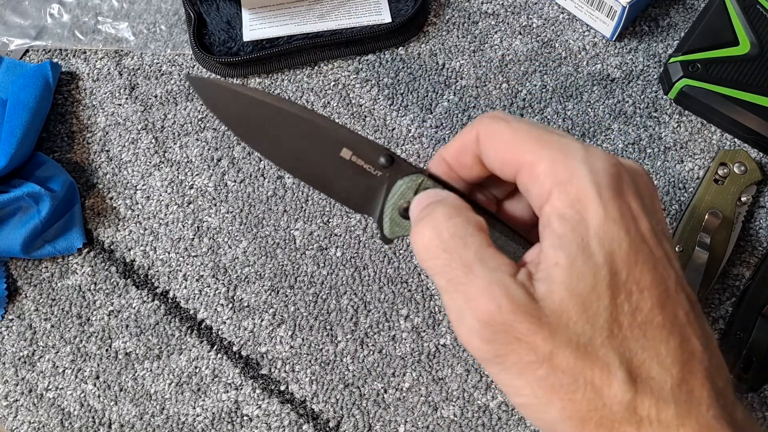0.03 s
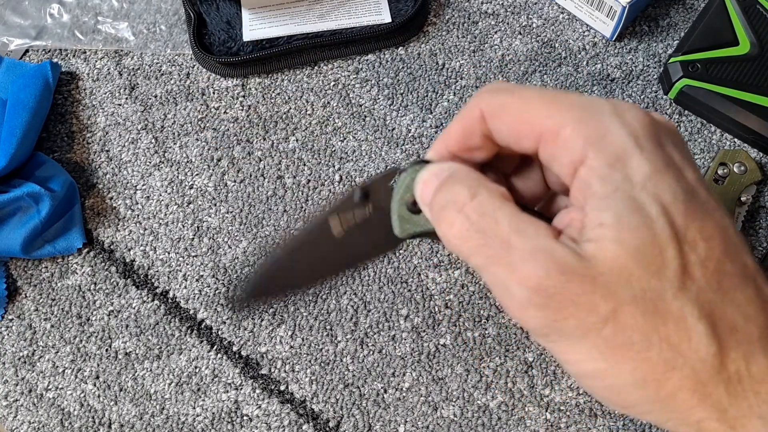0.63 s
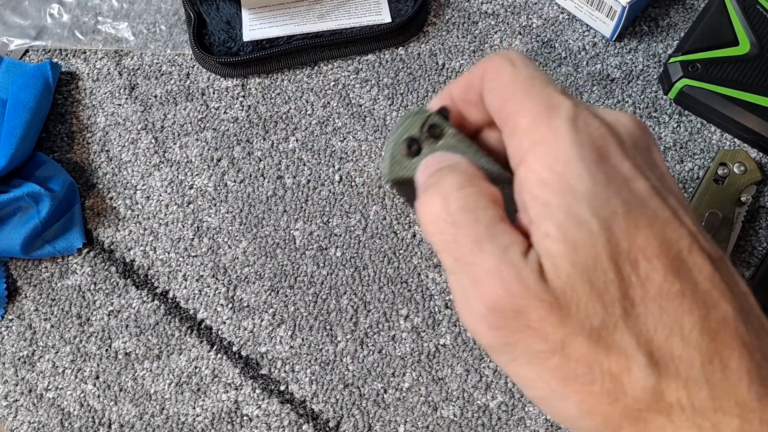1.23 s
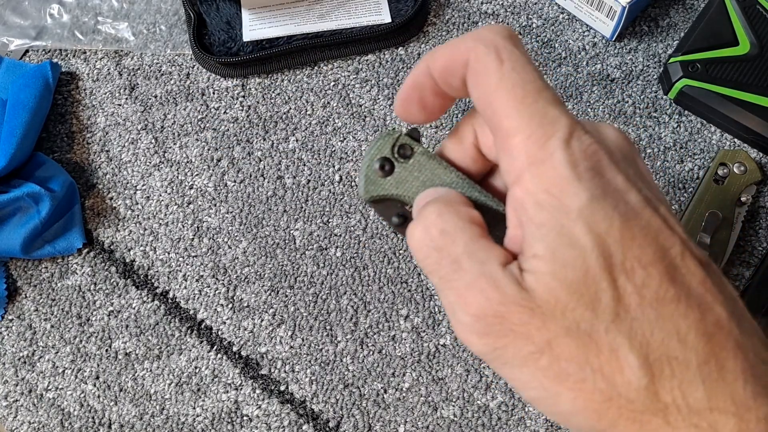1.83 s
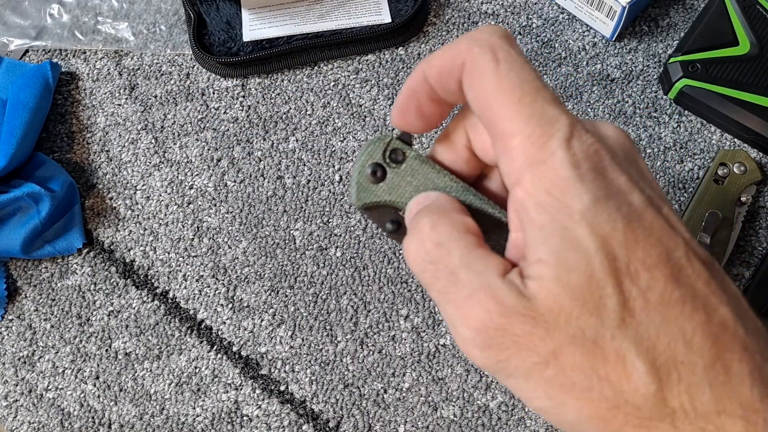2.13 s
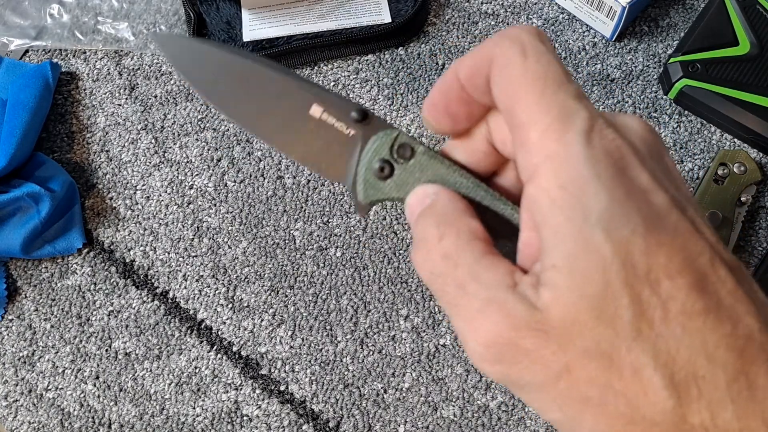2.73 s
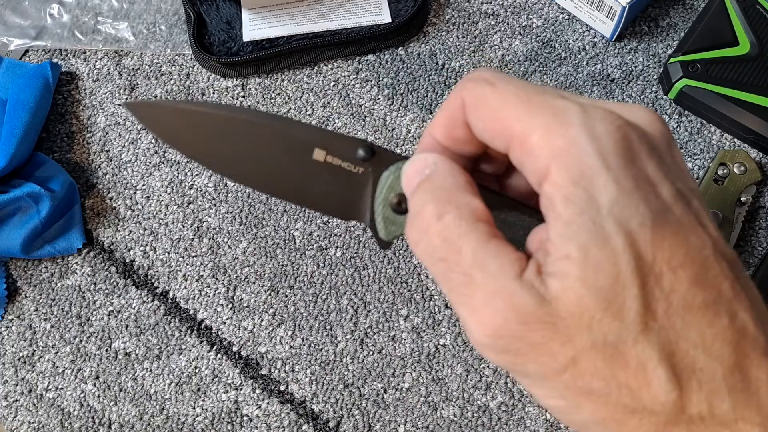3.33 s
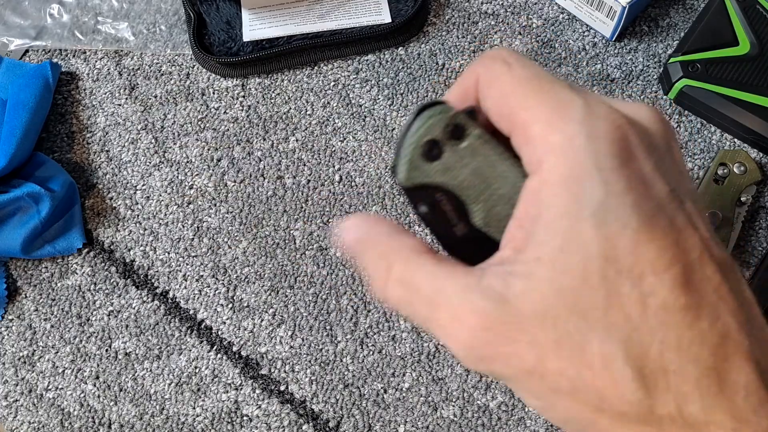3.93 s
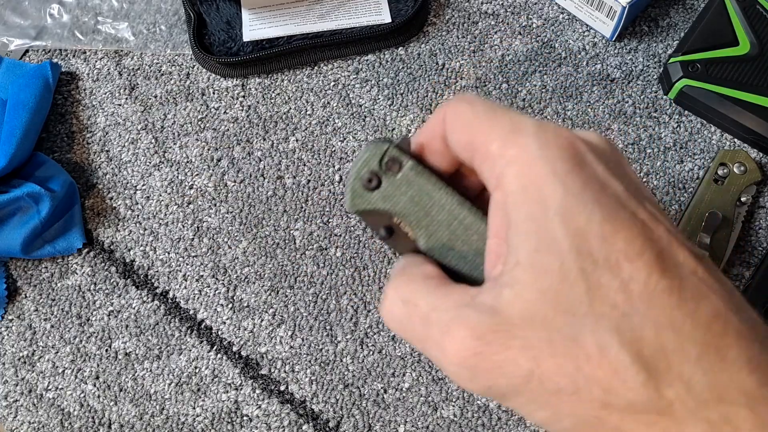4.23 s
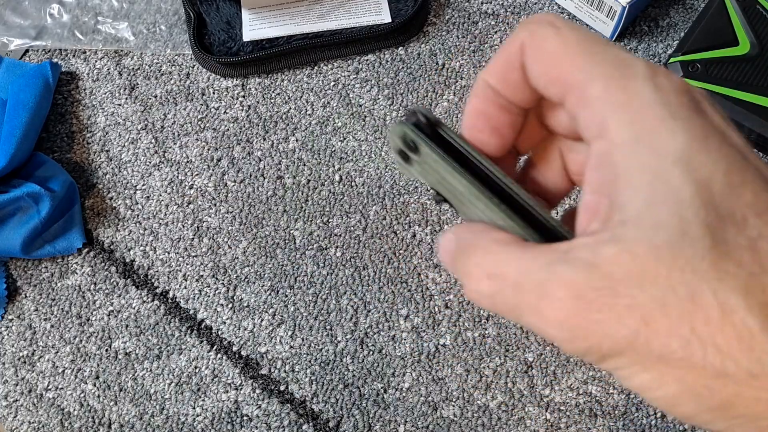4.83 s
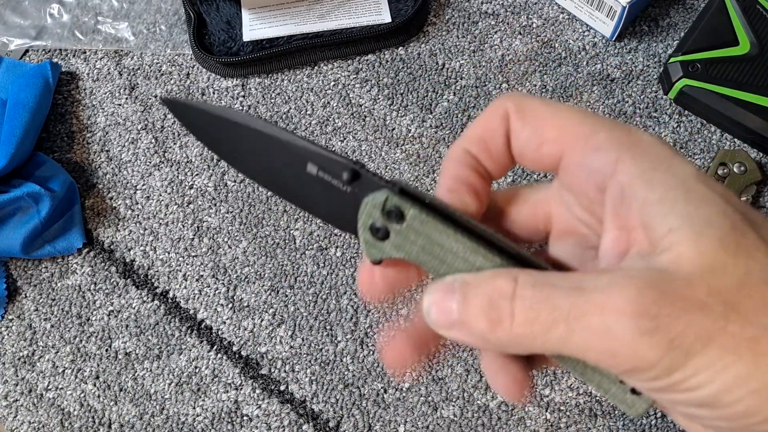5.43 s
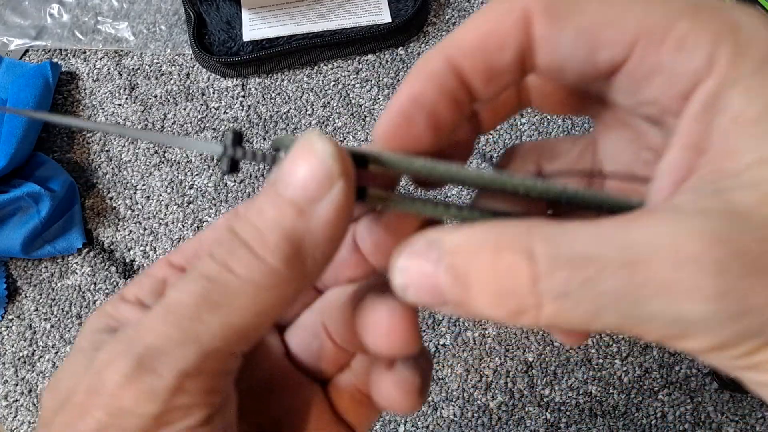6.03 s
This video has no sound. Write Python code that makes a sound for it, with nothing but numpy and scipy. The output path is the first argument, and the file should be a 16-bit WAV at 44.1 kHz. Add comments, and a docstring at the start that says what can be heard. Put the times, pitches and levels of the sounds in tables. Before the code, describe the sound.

In a small, quiet room with a faint low hum, a pocket knife is shut and opened twice, heard from close up. Each closing is a soft lock click followed by a bright steel snap as the blade lands in the handle. Each opening is a tick running straight into a hard clack with a short ring. The second opening rings more, and slight squeaks and faint ticks come from the handling.

```python
"""A pocket knife shut and flicked open twice

Close by, over a carpeted table in a small room, the lock bar is drawn back and the blade snaps into
the handle. On opening, the bar ticks over the tang (the blade's base), then the blade slams on its
stop pin and rings. Each click is a burst of noise plus the fading tones of the struck steel.
The pivot chirps, fingers slide on the grip, and the room hums faintly."""
import sys
import numpy as np
from scipy import signal
from scipy.fft import rfft, irfft
from scipy.io import wavfile
from scipy.ndimage import uniform_filter1d

SR = 44100
rng = np.random.default_rng(int(sys.argv[2]) if len(sys.argv) > 2 else 0)


def store_pcm(level_fs):
    """Save levels as 16-bit WAV."""
    pcm = np.round(np.clip(level_fs, -1, 1) * 32767).astype(np.int16)
    wavfile.write(sys.argv[1], SR, np.atleast_2d(pcm).T)


N = 268436
TIME = np.arange(N) / SR
AGE = TIME[:16384]   # seconds since a short sound began


# The blade hits its stop pin. Each row: start in seconds, relative level in dB, left over right in dB,
# brightness in dB per octave, then the amounts of knock, ring, blade note and jolt in dB.
OPENINGS = [(2.5635, -10, -1, 0.35, 2, -21.5, -23.5, -23.5), (5.2801, -11.5, -3, -0.4, -2, -8.5, -3, -27)]
# The colour of that hit. Each row: frequency in Hz, relative level in dB.
OPENING_COLOUR = [(40, -23), (150, -12), (280, -24.5), (560, -27.5), (800, -21.5), (980, -10.5),
                  (1350, -17.5), (2030, -5.5), (2500, -15.5), (3500, -6), (5200, -5.5), (7000, 2),
                  (8600, -2.5), (9350, 3.5), (10600, -7.5), (12400, -3.5), (13700, -4), (15300, 0.5),
                  (17000, -22.5)]
# The open blade's tones. Each row: pitch in Hz, relative level in dB, seconds to fade by 60 dB.
BLADE_TONES = [(927, -24.5, 0.1), (1008, -17, 0.07), (2029, -16.5, .14), (2080, -20.5, 0.12),
               (3260, -19.5, 0.12), (3610, -17, 0.11), (3993, -13.5, 0.069), (7550, -13.5, .06),
               (9200, -13, 0.064), (9450, -13, .07), (11800, -18.5, 0.1), (12400, -9.5, 0.1),
               (14800, -11, .11), (15100, -13.5, .06)]

def blade_opens():
    """The blade slams on its stop pin and rings."""
    return blows(OPENINGS, OPENING_COLOUR, BLADE_TONES,
                 gain_db=-3, rise=0.00022, t60=0.017, apart=0.6, knock_hz=1610)


def blade_note(hz, t60, rise, gain_db):
    """The open blade bends and sings one note when the grip leaves it free."""
    out = np.zeros((2, N))
    for start, db, pan_db, *_, note_db, _ in OPENINGS:
        add(out, start, tone(hz, t60, rise), db + note_db + gain_db, pan_db)
    return out


def hand_jolts(hz, t60, gain_db):
    """The stopped blade jerks knife and hand, making a soft, low thump."""
    out = np.zeros((2, N))
    thump = np.sin(2 * np.pi * hz * AGE) * dying(t60)
    for start, db, pan_db, *_, jolt_db in OPENINGS:
        add(out, start, thump, db + jolt_db + gain_db, pan_db)
    return out


# The blade lands in the handle. Each row: start in seconds, relative level in dB,
# left over right in dB, brightness in dB per octave, knock in dB, ring in dB.
CLOSINGS = [(0.8705, -13.5, -2.5, 3, -2, -20.5), (0.8792, -29, 6, -3.5, 1.5, -13),
            (4.0596, -13, 0.5, -0.8, 0.5, -36.5), (4.0681, -19.5, -0.5, 0, 6.5, -21.5)]
# The colour of that hit. Each row: frequency in Hz, relative level in dB.
CLOSING_COLOUR = [(60, -32.5), (200, -33.5), (500, -33), (1100, -29), (1650, -23.5), (2600, -22.5),
                  (3500, -12.5), (4500, -5.5), (5700, -5.5), (6700, 6), (8000, -3), (9500, -1),
                  (10700, -11.5), (12400, -5), (15500, -9.5), (17000, -29.5)]
# The shut knife's tones. Each row: pitch in Hz, relative level in dB, seconds to fade by 60 dB.
HANDLE_TONES = [(1568.6, -29, 0.046), (3514, -11, 0.058), (4700, -11.5, 0.071), (6616, -11, .05),
                (6900, -1, 0.052), (7900, -5.5, .06), (8770, -7.5, 0.069), (9120, 1, 0.054),
                (9550, -1.5, 0.22), (13200, -6.5, 0.13), (15000, -6.5, 0.065)]

def blade_shuts():
    """The blade falls into the handle and bounces once, and the handle rings."""
    return blows(CLOSINGS, CLOSING_COLOUR, HANDLE_TONES,
                 gain_db=-3, rise=0.0019, t60=0.019, apart=0.8, knock_hz=2510)


# The lock lets go. Each row: start in seconds, relative level in dB, left over right in dB,
# brightness in dB per octave, knock in dB, ring in dB.
RELEASES = [(0.5755, -31, -1.5, 0.57, 1.5, -12), (3.4068, -31.5, -0.5, -1.5, -4, -5)]
# The colour of that click. Each row: frequency in Hz, relative level in dB.
RELEASE_COLOUR = [(120, -20.5), (330, -0.5), (520, 1.5), (900, -10), (1800, -6.5), (2700, -20), (3400, -10),
                  (4400, -6.5), (6400, -4), (9400, -3), (10400, -10), (13000, -2.5), (15600, -3),
                  (17000, -20.5)]
# Lock bar and spring tones. Each row: pitch in Hz, relative level in dB, seconds to fade by 60 dB.
BAR_TONES = [(1570, -24, .06), (3340, -18.5, .04), (6600, -9.5, 0.044), (9360, 1.5, 0.069),
             (13400, -12, .04), (15600, -11.5, 0.037)]

def lock_releases():
    """The lock bar breaks free of the tang with a click."""
    return blows(RELEASES, RELEASE_COLOUR, BAR_TONES,
                 gain_db=-2, rise=0.00089, t60=0.0088, apart=0.44, knock_hz=1211)


# The bar's ticks. Each row: start in seconds, relative level in dB, brightness in dB per octave,
# ring in dB.
BAR_TICKS = [(0.784, -55.5, 0.5, -9.5), (0.8184, -41, 4.5, -17), (2.2530, -57, 2.5, -15),
             (2.4887, -34.5, -0.5, -20), (2.5031, -23, -1, -18.5), (3.626, -45, 4.5, -1),
             (5.2275, -38, -1.5, -23.5), (5.24, -20, 0, -22), (5.893, -50, 7.5, -13.5),
             (6.0502, -58, -5, -27.5)]
# The colour of a tick. Each row: frequency in Hz, relative level in dB.
BAR_TICK_COLOUR = [(100, -43.5), (300, -35.5), (1000, -32.5), (1520, -22.5), (2200, -28.5), (3800, -11.5),
                   (4800, -6.5), (6500, -0.5), (9500, 1), (11300, -7.5), (13500, -5), (15600, -0.5),
                   (17000, -19)]

def lock_ticks(pan_db, knock_db):
    """The lock bar ticks over the tang, always from one place and equally squarely."""
    rows = [(start, db, pan_db, tilt, knock_db, ring_db) for start, db, tilt, ring_db in BAR_TICKS]
    return blows(rows, BAR_TICK_COLOUR, BAR_TONES,
                 gain_db=-5.5, rise=0.0007, t60=0.015, apart=1.0, knock_hz=2500)


def blows(rows, colour, ring_tones, gain_db, rise, t60, apart, knock_hz):
    """Each blow is a clack plus the struck part's ring; a squarer blow has more low knock."""
    out = np.zeros((2, N))
    for start, db, pan_db, tilt, knock_db, ring_db, *_ in rows:
        shaded = [(hz, level + tilt * np.log2(hz) + knock_db / (1 + (hz / knock_hz) ** 4))
                  for hz, level in colour]
        sound = clack(shaded, rise, t60, apart) + from_db(ring_db) * ringing(ring_tones, rise)
        add(out, start, sound, db + gain_db, pan_db)
    return out


def clack(colour, rise, t60, apart):
    """Steel chatters briefly on steel; `apart` sets how much left and right differ."""
    white = rng.standard_normal(len(AGE)) + apart * rng.standard_normal((2, len(AGE)))
    force = rfft(white * struck(rise, t60))
    # Even out the burst, so its broad colour comes from the struck part alone.
    spread = np.sqrt(uniform_filter1d(np.abs(force) ** 2, size=601, axis=1))
    gain = from_db(at_hz(colour, np.fft.rfftfreq(len(AGE), 1 / SR)))
    sound = irfft(force * minimum_phase(gain / spread))
    energy = np.sum(sound ** 2, axis=1, keepdims=True)
    return sound * np.sqrt(0.003 * SR / energy)   # as much energy as 3 ms at level 1


def ringing(tones, rise):
    """Every blow shares itself out a little differently among the steel's tones."""
    shares_db = rng.normal(0, 2, len(tones))
    return sum(from_db(db + share) * tone(hz, t60, rise)
               for (hz, db, t60), share in zip(tones, shares_db))


def tone(hz, t60, rise):
    """One pure tone that builds up during the blow and dies away."""
    return np.sin(2 * np.pi * (hz * AGE + rng.random())) * struck(rise, t60)


# Tiny squeaks. Each row: start in seconds, relative level in dB, pitch in Hz, unsteadiness in Hz.
SLIPS = [(3.502, -76.5, 3130, 80), (3.510, -47.5, 3080, 76), (3.564, -55, 3390, 90), (3.663, -52, 3466, 89),
         (4.901, -60, 2550, 260), (4.925, -57.5, 2666, 260)]

def pivot_chirps(slip_s, gain_db, third_db):
    """Pivot and grip stick and slip, making a brief, unsteady tone with two overtones."""
    out = np.zeros((2, N))
    average_db = np.mean([db for _, db, *_ in SLIPS])
    swell = np.sin(np.pi * np.minimum(AGE / slip_s, 1)) ** 2
    for start, db, hz, width_hz in SLIPS:
        wander = np.cumsum(rng.standard_normal(len(AGE))) * np.sqrt(2 * np.pi * width_hz / SR)
        phase = 2 * np.pi * hz * AGE + wander
        overtones = np.sin(2 * phase) + from_db(third_db) * np.sin(3 * phase)
        overtone_db = -0.5 - 0.03 * (db - average_db)   # louder slips are slightly purer
        chirp = swell * (np.sin(phase) + from_db(overtone_db) * overtones)
        add(out, start, chirp, db + gain_db, pan_db=0)
    return out


# Fingers move on the grip. Each row: fastest moment in seconds, level then in dB.
FINGER_SLIDES = [(4.85, -76), (5.88, -79.5)]

def finger_slides(band_hz, grain_db, rise_db_per_s, fall_db_per_s):
    """Skin rubs the textured grip: a grainy whisper that swells slowly and fades sooner."""
    level = sum(from_db(db - np.maximum(rise_db_per_s * (peak - TIME), fall_db_per_s * (TIME - peak)))
                for peak, db in FINGER_SLIDES)
    grains = rng.standard_normal((2, N)) * from_db(grain_db * rng.standard_normal(N))
    return level * rms_one(band_pass(grains, band_hz))


# How long echoes last. Each row: frequency in Hz, seconds to fade by 60 dB.
ECHO_TIMES = [(200, 0.5), (800, 0.2), (2000, 0.2233), (5500, 0.28), (9000, 0.2623), (15000, 0.25)]
# How strong echoes are. Each row: frequency in Hz, level in dB relative to the knife.
ECHO_LEVELS = [(200, -5), (500, -12.5), (1000, -4), (3000, -9), (7000, -12.5), (15000, -13.5)]

def room_echoes(knife, first_s, early_db, early_t60):
    """Sound scatters off hand and table, then the room echoes, longest in the bass."""
    edges_hz = np.geomspace(120, 18000, 11)
    white = rng.standard_normal((2, 2, len(AGE)))
    scatter = rng.standard_normal((2, len(AGE))) * dying(early_t60) * (AGE > first_s / 2)
    response = from_db(early_db) * rms_one(scatter) / np.sqrt(len(AGE))
    for k, (low, high) in enumerate(zip(edges_hz, edges_hz[1:])):
        hz = np.sqrt(low * high)
        fade = dying(at_hz(ECHO_TIMES, hz)) * np.clip(AGE / first_s - 1, 0, 1)
        band = band_pass(white[k % 2], [low, high])
        response += from_db(at_hz(ECHO_LEVELS, hz)) * band * fade / np.sqrt(np.sum(fade ** 2))
    return signal.fftconvolve(knife, response, axes=1)[:, :N]


# An appliance's tones. Each row: pitch in Hz, level in dB before the left-right split.
HUM_TONES = [(57, -72.5), (150.5, -81.5)]

def appliance_hum(pan_db):
    """An appliance hums on steady, low tones."""
    hum = sum(from_db(db) * np.sqrt(2) * np.sin(2 * np.pi * (hz * TIME + rng.random()))
              for hz, db in HUM_TONES)
    return hum * pan(pan_db)


# The colours of the rumble and the hiss. Each row: frequency in Hz, relative level in dB.
RUMBLE_COLOUR = [(13, -49), (22, -24), (37, -8), (59, 2), (81, -8), (109, -4), (129, -20.5), (157, -14),
                 (178, -26.5), (238, -22.5), (322, -30.5), (354, -29), (495, -35.5), (1000, -51),
                 (1300, -74), (2200, -120)]
HISS_COLOUR = [(600, 3.5), (1500, 1), (3000, -2), (5900, -6.5), (6900, 1), (8400, 3), (9400, -6),
               (15500, -4.5), (16300, -26)]

def rumble_and_hiss(rumble_db, hiss_db):
    """The house rumbles and the microphone hisses faintly."""
    rumble = from_db(rumble_db) * steady_noise(RUMBLE_COLOUR)
    return rumble + from_db(hiss_db) * steady_noise(HISS_COLOUR)


# How alike the two sides are. Each row: frequency in Hz, likeness from -1 (opposite) to 1 (same).
SIDE_LIKENESS = [(60, 0.15), (180, 0.64), (550, 0.087), (1650, -0.32), (4970, -0.2), (15000, -0.5)]
# Which side is louder. Each row: frequency in Hz, left over right in dB.
SIDE_BALANCE = [(60, -11.5), (150, -9), (380, 2.5), (950, 1.5), (2380, 0.5), (5980, -2.5), (15000, 0)]

def steady_noise(colour):
    """Smooth stereo noise of a given colour, stronger on the right in the bass."""
    hz = np.fft.rfftfreq(N, 1 / SR)
    shared, opposed = rfft(rng.standard_normal((2, N)))
    alike = at_hz(SIDE_LIKENESS, hz)
    sides = np.array([[1], [-1]])
    pair = np.sqrt(1 + alike) * shared + np.sqrt(1 - alike) * opposed * sides
    pair *= from_db(sides * at_hz(SIDE_BALANCE, hz) / 2)
    return rms_one(irfft(pair * from_db(at_hz(colour, hz)), N))


def from_db(db):
    """Turn decibels into a multiplier."""
    return 10 ** (np.asarray(db) / 20)


def rms_one(x):
    """Scale a sound to an average (rms) level of 1."""
    return x / np.sqrt(np.mean(x ** 2) + 1e-20)


def at_hz(points, hz):
    """Read between a table's rows, with octaves evenly spaced."""
    freq, value = np.transpose(points)
    return np.interp(np.log(np.maximum(hz, 1)), np.log(freq), value)


def dying(t60):
    """A fade that loses 60 dB in t60 seconds."""
    return np.exp(-np.log(1000) * AGE / t60)


def struck(rise, t60):
    """A level that builds in about `rise` seconds and fades."""
    return dying(t60) * (1 - np.exp(-(AGE / rise) ** 2))


def band_pass(x, band_hz):
    """Keep what lies between two frequencies."""
    return signal.sosfilt(signal.butter(2, band_hz, "band", fs=SR, output="sos"), x)


def minimum_phase(gain):
    """A filter with these gains that never sounds before the blow."""
    cepstrum = irfft(np.log(gain))
    half = cepstrum.shape[-1] // 2
    cepstrum[..., 1:half] *= 2
    cepstrum[..., half + 1:] = 0
    return np.exp(rfft(cepstrum))


def pan(db):
    """Left and right multipliers; positive dB favours the left."""
    return from_db([[db / 2], [-db / 2]])


def add(track, start_s, sound, db, pan_db):
    """Mix in a knife sound; the left side is nearer, so the right hears it 4 samples later."""
    left, right = np.broadcast_to(sound, (2, len(AGE)))
    pair = from_db(db) * np.array([left, np.roll(right, 4)]) * pan(pan_db)
    start = round(start_s * SR)
    track[:, start:start + len(AGE)] += pair[:, :N - start]


def scene():
    """The knife, its room and the quiet behind it."""
    knife = blade_opens() + blade_shuts() + lock_releases() + lock_ticks(pan_db=-0.5, knock_db=-1.5)
    knife += blade_note(hz=6798, t60=0.046, rise=0.00079, gain_db=-8)
    knife += pivot_chirps(slip_s=0.0067, gain_db=-1.5, third_db=-13)
    jolts = hand_jolts(hz=62, t60=0.1, gain_db=-0.5)
    rub = finger_slides(band_hz=[6300, 10000], grain_db=6, rise_db_per_s=38.5, fall_db_per_s=104.5)
    echoes = room_echoes(knife, first_s=0.0057, early_db=-7.5, early_t60=0.06)
    background = appliance_hum(pan_db=-11) + rumble_and_hiss(rumble_db=-60.5, hiss_db=-77.5)
    return knife + jolts + rub + echoes + background


def record(dry):
    """Soften the bass below 30 Hz and cut the treble steeply above 16500 Hz."""
    dry = signal.sosfilt(signal.butter(2, 30, "high", fs=SR, output="sos"), dry)
    return signal.sosfilt(signal.ellip(10, 0.3, 70, 16500, fs=SR, output="sos"), dry)


dry = scene()
out = record(dry)
store_pcm(out)
```